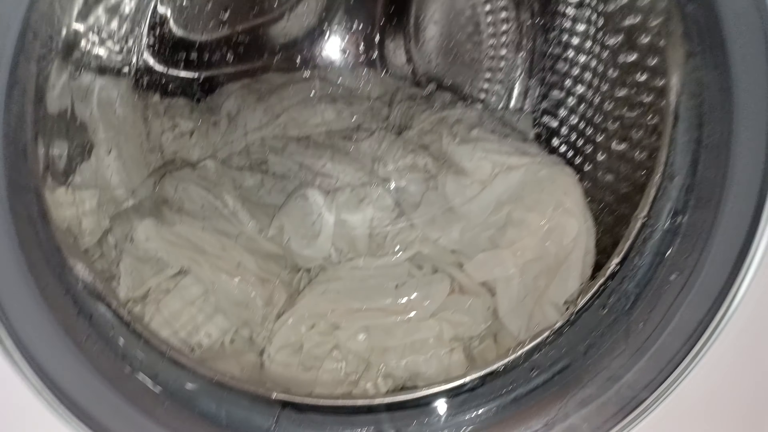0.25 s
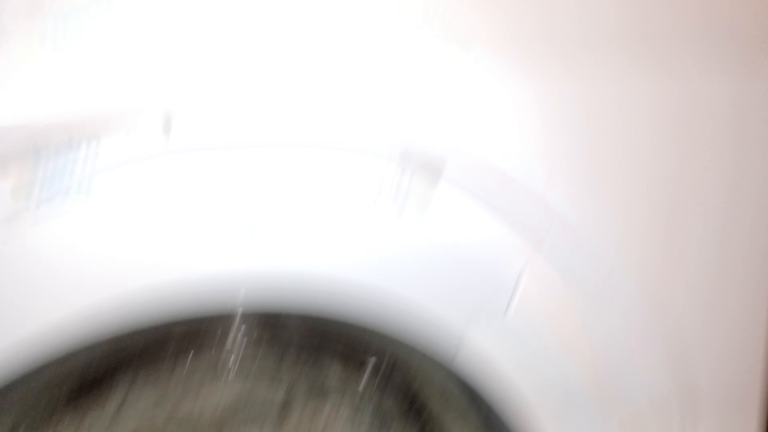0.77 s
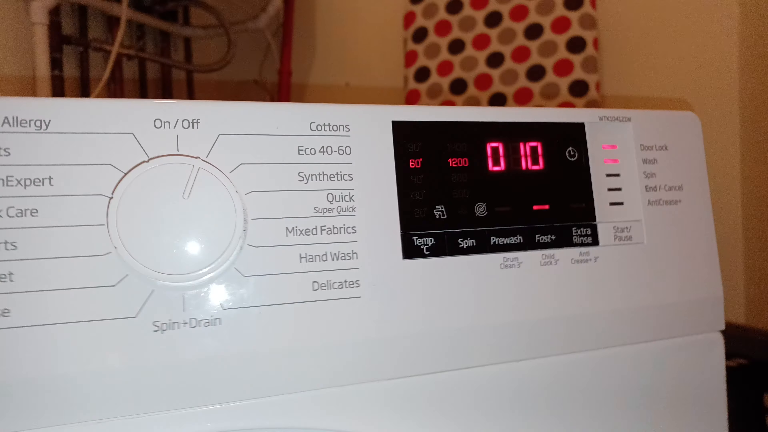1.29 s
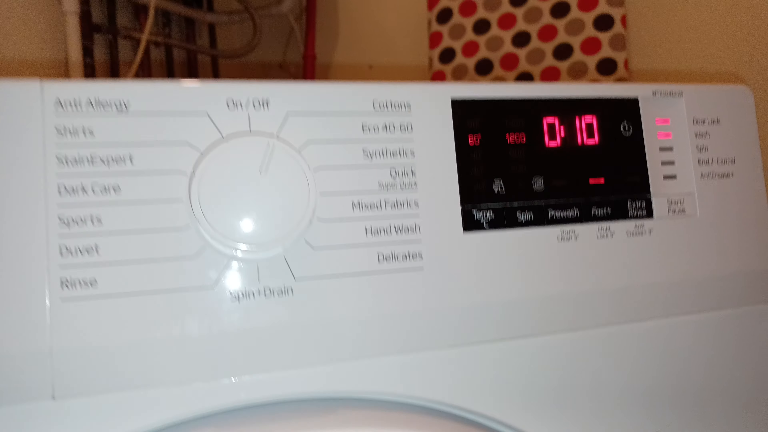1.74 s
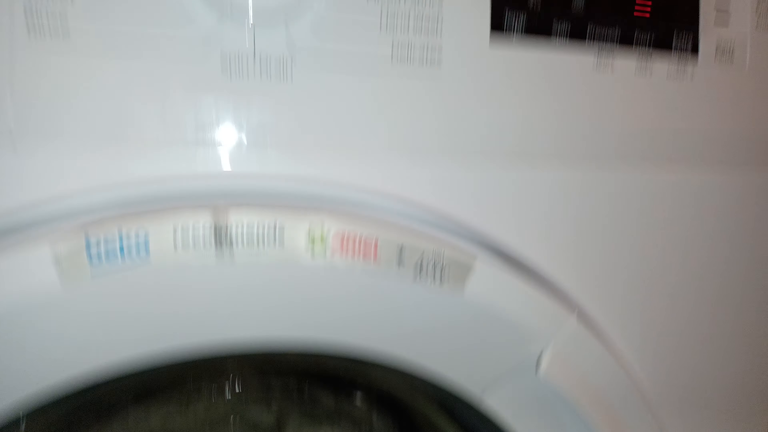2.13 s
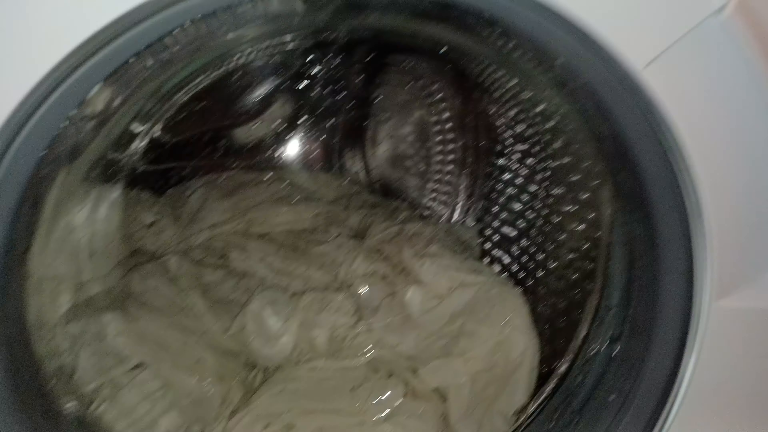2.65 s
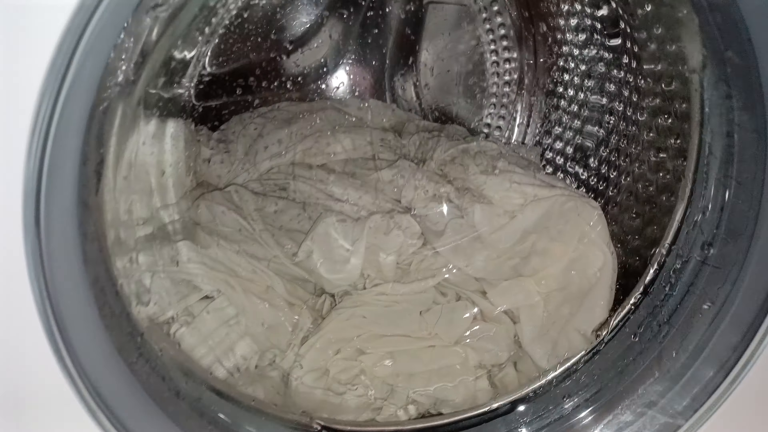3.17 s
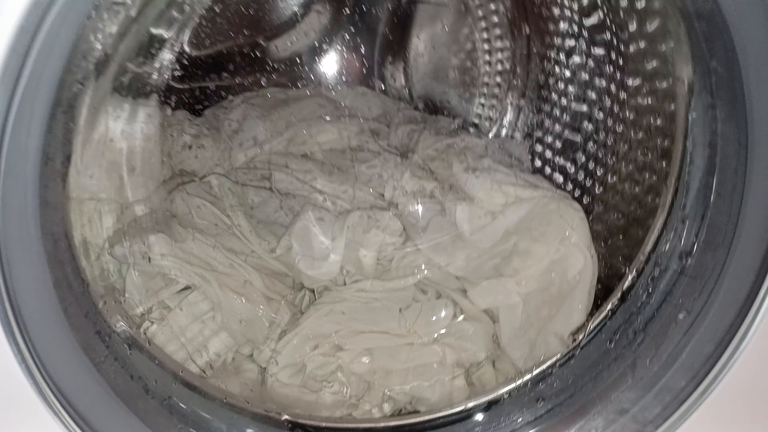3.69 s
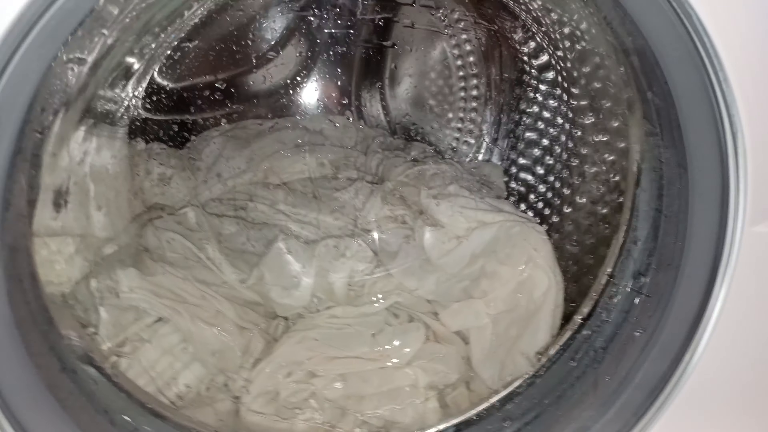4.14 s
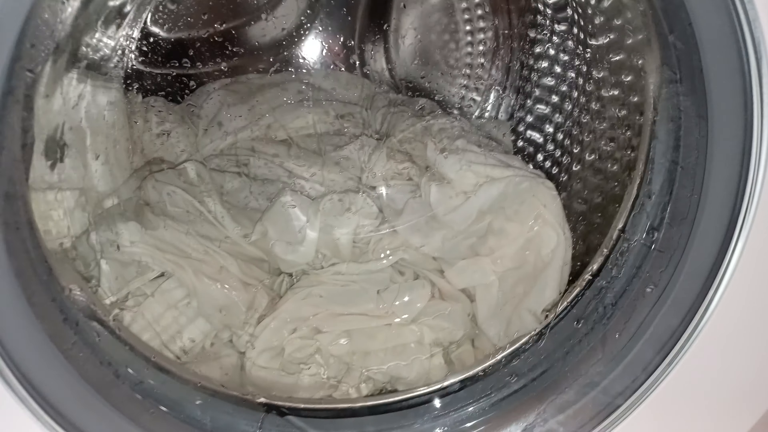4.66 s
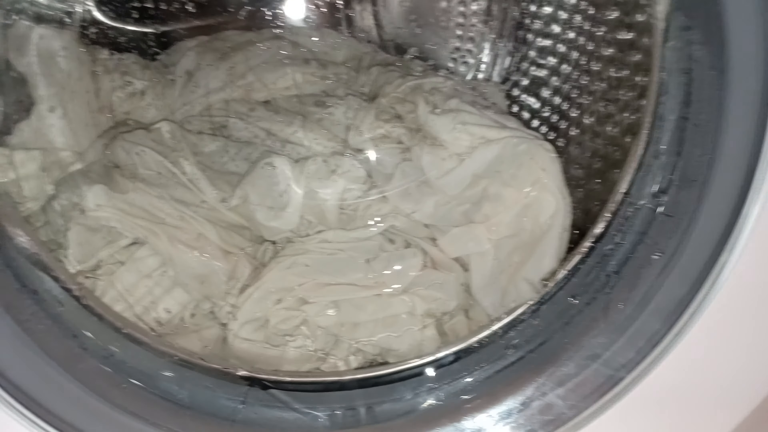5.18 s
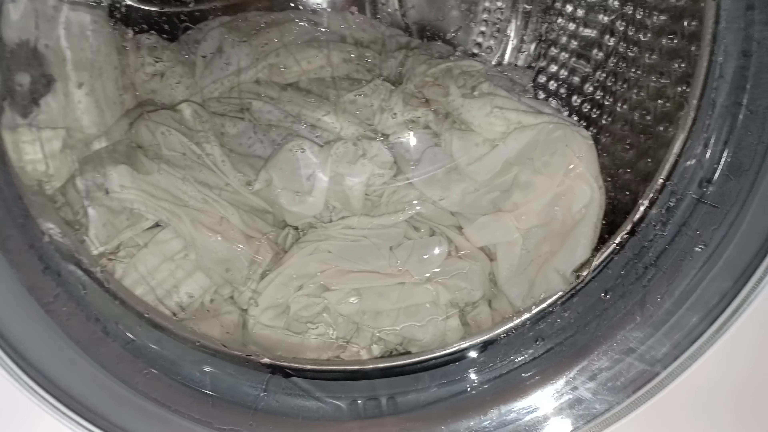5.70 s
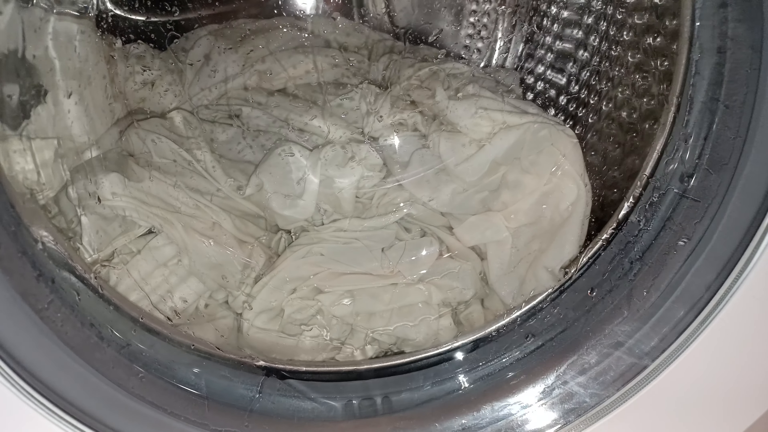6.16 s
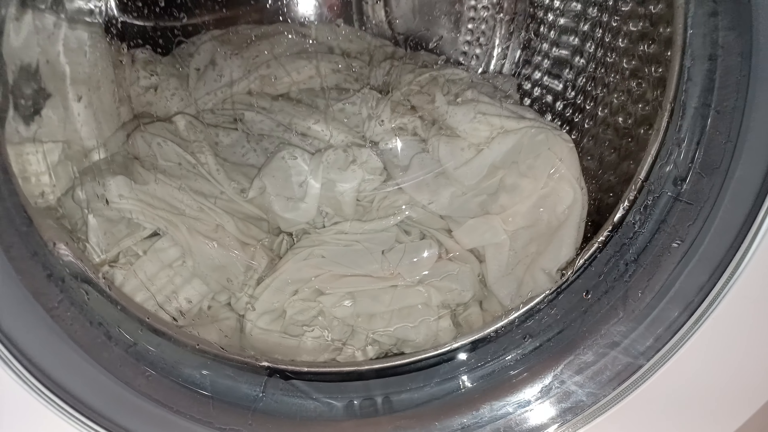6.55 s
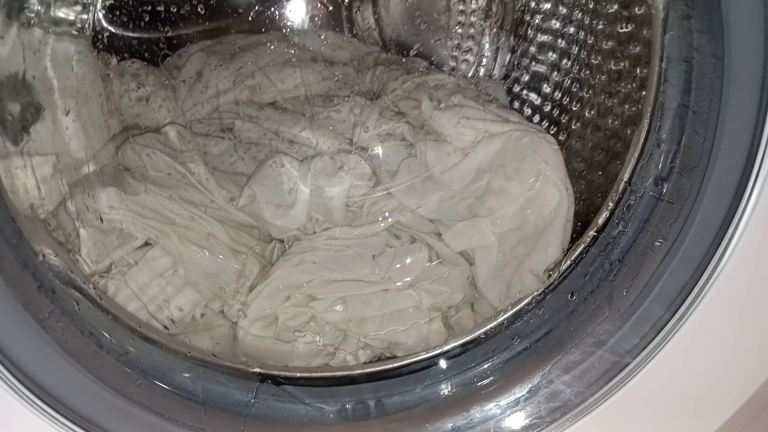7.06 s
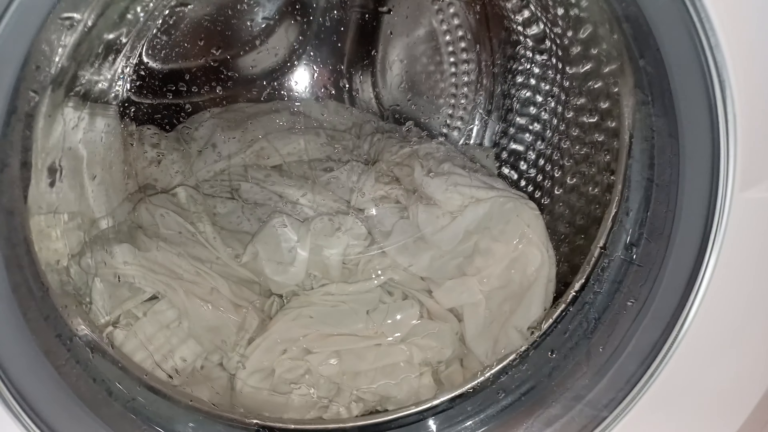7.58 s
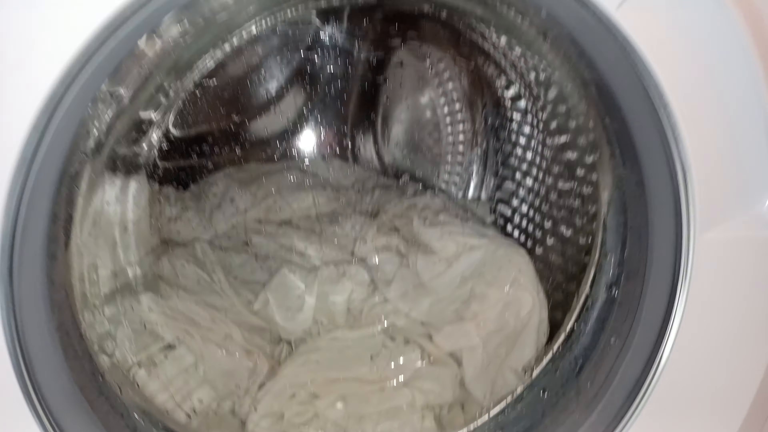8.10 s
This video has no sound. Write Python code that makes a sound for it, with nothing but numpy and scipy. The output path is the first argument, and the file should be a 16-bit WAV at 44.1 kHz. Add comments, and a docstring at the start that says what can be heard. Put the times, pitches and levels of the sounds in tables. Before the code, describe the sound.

A low, buzzing pump drone with a faint whine runs throughout, wrapped in churning, airy cabinet noise. Soft boomy knocks stumble in rapidly at first, strike again in pairs, then fade to faint bumps. Two weak breathy whistling resonances waver inside the rush. Treble hiss steps up after three seconds. Heard indoors, close to the washer door, in stereo, the microphone drifting and finally backing away.

```python
"""Near a washing machine, at a hand-held stereo microphone: the pump motor drones at multiples of the
mains, as sines, over water and air in the cabinet, made of noise coloured by its resonances.
Dull knocks, most of them early, are falling sines with ringing panel modes and ticks of noise.
A low shudder of noise gathers around each knock over a growing floor; narrow noise makes two whistles.
A thin hiss of treble noise swells briefly at 2.56 s, then steps up near 3.2 s and stays."""
import sys
import numpy as np
from scipy import signal
from scipy.fft import rfft, irfft
from scipy.io import wavfile
from scipy.ndimage import uniform_filter1d

SR = 44100
rng = np.random.default_rng(int(sys.argv[2]) if len(sys.argv) > 2 else 0)


def dump_mix(stems):
    """Bounce the given channels to the path in sys.argv[1] as a 16-bit WAV at rate SR."""
    frames = np.atleast_2d(stems).T  # one column per channel
    limited = np.clip(frames, -1, 1)  # hard clip at full scale
    pcm = np.round(limited * 32767).astype(np.int16)
    wavfile.write(sys.argv[1], SR, pcm)


N = 367353  # samples

# Moves of the hand-held microphone (start [s], end [s])
SETTLE_S = (2.2, 3.35)  # the hand settles into its steady place
BACK_AWAY_S = (5.5, 8.9)  # it backs away from the door, and is still moving at the end


MAINS_HZ, MAINS_START_RAD = 49.99, -1.03  # the start is the place in the mains cycle
ODD_LAG_RAD = -1.8  # by which the odd multiples trail the even ones
LOOSE = (3, 5)  # multiples that waver more than the rest
LOW_TONE_DROP = (7, 7.1, -3)  # the hand pulls back: (start [s], end [s], change [dB])
THIRD_TONE_DROP = (.9, 0.95, 7.5)  # (start [s], end [s], level before it above that after it [dB])
TURN_ASIDE = (1.6, 1, -3)  # sixth tone swings right: (middle [s], width [s], left-right [dB])
EARLY_LEAD_RAD = 0.6  # added left lead of the sixth tone until the hand settles
# Strong motor tones; each swells or sinks once as the hand drifts through its standing wave:
# (multiple of the mains, level at start [dB], growth [dB/s], left-right [dB], swell [dB],
#  swell middle [s], swell width [s], change on backing away [dB])
STRONG_TONES = [(2, -44, 0.49, 0, 1.7, 6.9, 1.2, -1.5), (3, -56.5, 0.07, -2, 9.5, 4.24, 3.9, -20),
                (4, -42.5, 1.0, -2.5, -5.5, 1.62, 1.97, -4.5), (5, -57.5, -0.7, 2, 2, 5.1, 2.4, -11),
                (6, -48, 0.65, 2.5, -3.5, 3.16, 1.8, -5)]
# Stereo phase of the strong tones, {multiple: left lead [rad]}
STRONG_LEAD_RAD = {2: -0.055, 3: .1, 4: -0.22, 5: 0.18, 6: .25}
# Upper motor tones; each microphone drifts through its own part of their standing waves:
# {multiple: rows of (time [s], left level [dB], right level [dB], left lead [rad])}
WHINE_TONES = {9: [(0, -72.5, -65, 0.1), (.8, -57, -59, .9), (1.2, -50, -72, -1.6), (2.2, -56.5, -63, .5),
               (2.7, -77, -56, .9), (5.8, -70, -59, 0.74), (8.33, -80, -75, .6)], 11: [(0, -63, -60, -1.1),
               (.42, -61, -50, -.9), (1.0, -58, -48, -.4), (2.3, -59, -48, -1.1), (2.8, -60, -53, -2.3),
               (4.3, -65, -52, -2.4), (6.3, -61, -55, -2.7), (8.33, -63, -58, -2.8)],
               12: [(0, -66, -68, -1.1), (1.5, -60, -59, .5), (2.5, -72, -66, 2.9), (3.5, -63, -58, 3.5),
               (6.5, -63, -61, 3), (8.33, -74, -54, 1.5)], 15: [(0, -63, -68, -3), (1.5, -63, -63, 0),
               (2.5, -57, -58, -1.7), (4.5, -62, -59, -3.5), (6.5, -58, -58.5, -2.5), (8.33, -58, -64, -2)],
               16: [(0, -65, -65, -1), (2.6, -70, -70, -2.5), (3.4, -58, -54.5, -1.5), (4.7, -59, -56, -3),
               (5.6, -65, -64, 1), (6.7, -61, -64, 0), (7.5, -59, -54, -2), (8.33, -61, -63, -4)],
               17: [(0, -63, -58, -1.3), (2.5, -63, -59, -1.2), (3.5, -68, -56, -1.5),
               (5.5, -66, -56, -0.86), (8.33, -69, -67, -1.5)], 18: [(0, -80, -68, -1.8),
               (2.5, -63, -67, -.5), (3.5, -66, -69, -.3), (5.5, -58.5, -77, -1.1), (8.33, -59, -78, -1.5)],
               13: [(0, -64, -50, 2), (.7, -62, -52, .5), (1.2, -51, -74, -3), (2.3, -53, -61, -1),
               (2.9, -64, -57, -5.5), (4.5, -67, -54.5, -5), (6.3, -65, -54, -6.5), (8.33, -69, -60, -6.5)]}
# Faint motor tones (multiple of the mains, left level [dB], right level [dB])
FAINT_TONES = [(7, -67, -65.5), (8, -69.5, -63.5), (10, -64, -70), (14, -64, -63), (19, -62.5, -63),
               (25, -81, -62.5)]


def motor():
    """Magnetic pull at multiples of the mains; the strong tones run in step as a soft sawtooth."""
    t, sides = np.arange(N) / SR, np.array([[.5], [-.5]])
    turn = 2 * np.pi * MAINS_HZ * t + MAINS_START_RAD
    return np.sqrt(2) * (strong_tones(t, sides, turn) + whine(sides, turn) + faint_tones(turn))


def strong_tones(t, sides, turn):
    """Low multiples of the mains, locked in phase, with levels that follow the microphone."""
    out, away = np.zeros((2, N)), ramp(t, *BACK_AWAY_S)
    for k, db, growth_db, balance_db, swell_db, middle, width, away_db in STRONG_TONES:
        k = round(k)
        level_db = db + growth_db * t + swell_db * hump(t, middle, width) + away_db * away
        lead = STRONG_LEAD_RAD[k]
        waver_db = 0.3  # rms
        if k in LOOSE:
            waver_db += 2.1
        if k == 2:
            level_db = level_db + LOW_TONE_DROP[2] * ramp(t, *LOW_TONE_DROP[:2])
        if k == 3:
            level_db = level_db + THIRD_TONE_DROP[2] * (1 - ramp(t, *THIRD_TONE_DROP[:2]))
        if k == 6:
            balance_db = balance_db + TURN_ASIDE[2] * hump(t, *TURN_ASIDE[:2])
            lead = lead + EARLY_LEAD_RAD * (1 - ramp(t, *SETTLE_S))
            waver_db += .9
        level_db = level_db + sides * balance_db + waver_db * drift(top_hz=8)
        phase = k * turn + lead * sides - ODD_LAG_RAD * (k % 2)
        out -= gain_of(level_db) * np.sin(phase)
    return out


def whine(sides, turn):
    """Upper multiples of the mains, each with its own path of level and phase at either side."""
    out = np.zeros((2, N))
    for k, rows in WHINE_TONES.items():
        left_db, right_db, lead = over_time(rows)
        level = gain_of([left_db, right_db] + 0.45 * drift(top_hz=7.2))
        phase = round(k) * turn + sides * lead + 0.65 * drift(top_hz=0.98)
        out += level * np.sin(phase)
    return out


def faint_tones(turn):
    """Weak multiples; each side sits in its own part of the standing wave and wavers alone."""
    out = np.zeros((2, N))
    for k, *sides_db in FAINT_TONES:
        for side, db in enumerate(sides_db):
            level = gain_of(db + 2.0 * drift(top_hz=8, low_hz=0.495))
            out[side] += level * np.sin(round(k) * turn + 1.25 * drift(top_hz=0.812))
    return out


RUSH_BAND_HZ = (700, 5000)  # where the level curve holds
# Bright band that fades early
OPENING_HZ, OPENING_WIDTH_HZ, OPENING_DB, OPENING_FADE_S = 2700, 350, 4.7, (.35, .8)
# Broad colour of the rush (frequency [Hz], relative density [dB per Hz])
RUSH_COLOUR = [(24, -30), (42, -46), (60, -35), (81, -5), (111, -25), (150, -13.5), (198, -14.5),
               (248, -17.5), (310, -14), (430, -15.5), (1540, -17.5), (1700, -15.5), (2020, -10.5),
               (2500, -16), (3020, -21.5), (3800, -23), (4970, -23.5), (15700, -55)]
# Cabinet peaks and dips in the rush (frequency [Hz], width [Hz], change [dB])
CABINET_MODES = [(80.6, 7.8, 11), (125.1, 14.6, 21.5), (179, 18, -21), (249, 59, 5.5), (283, 32, 9.5),
                 (441, 19, -12.5), (885, 20, -4), (1272, 32, -4), (1480, 350, 2), (1527, 120, 3),
                 (1990, 550, -4)]
# Bands that change with the place of the microphone
# (frequency [Hz], width [Hz], before settling [dB], settled [dB], backed away [dB])
PLACE_BANDS = [(476, 160, 5.5, -3, -3.5), (720, 1800, 0.3, 2, 3.5), (930, 160, 2.5, -0.5, -3.5),
               (2500, 2200, 1.5, -0.85, -1.5), (5800, 2800, -2, -2.5, 1)]
# Level of the rush in its band, before surges and flutter (time [s], level [dB])
RUSH_LEVEL_CURVE = [(0, -43), (.35, -42.5), (2.1, -42.5), (3.5, -40.5), (4.9, -41), (5.6, -40.5),
                    (6.3, -42), (7.7, -42), (8.33, -43)]
# Short surges of the rush (middle [s], width [s], rise [dB])
RUSH_SURGES = [(.38, .08, 1.8), (.75, .12, 0.2), (1.27, 0.095, 0.9), (1.72, .1, 1), (2.25, 0.074, 1.1),
               (2.56, 0.097, 1.9)]


def rush():
    """Water and air churned by the pump: noise heard through the resonances of the cabinet."""
    def colour_db(hz, t):
        opening_db = OPENING_DB * (1 - ramp(t, *OPENING_FADE_S))
        total = over_hz(RUSH_COLOUR, hz) + opening_db * bell(hz, OPENING_HZ, OPENING_WIDTH_HZ)
        for f, width, db in CABINET_MODES:
            total = total + db * bell(hz, f, width)
        settled, away = ramp(t, *SETTLE_S), ramp(t, *BACK_AWAY_S)
        for f, width, early_db, settled_db, away_db in PLACE_BANDS:
            place_db = early_db * (1 - settled) + settled_db * (settled - away) + away_db * away
            total = total + place_db * bell(hz, f, width)
        return total

    t = np.arange(N) / SR
    surge_db = sum(db * hump(t, middle, width) for middle, width, db in RUSH_SURGES)
    flutter_db = 0.5 * drift(top_hz=25.44, low_hz=4.5)
    level = gain_of(over_time(RUSH_LEVEL_CURVE) + surge_db + flutter_db)
    return level * noise(colour_db, patchy_db=1.1, ridged_db=3.5, size=4096, unit_band=RUSH_BAND_HZ)


GLIDE_S = 0.0034  # time constant of the fall in pitch of a thud
# Knocks (time [s], thud level [dB], push 1 or pull -1, starting pitch [Hz], settled pitch [Hz],
#  rise [s], t60 [s], tick level before its treble is sharpened [dB], shudder level [dB])
KNOCK_EVENTS = [(0.119, -27, 1, 200, 140, .005, .04, -80, -44),
                (0.145, -26, 1, 230, 190, .004, .05, -80, -44),
                (0.179, -19.5, 1, 170, 130, .005, .065, -79, -44),
                (0.2015, -23, 1, 240, 180, .003, .05, -80, -42),
                (0.2413, -15.5, 1, 242, 125, .004, .04, -66, -42),
                (0.269, -23, -1, 240, 150, .003, .04, -80, -42),
                (0.308, -17, 1, 230, 120, .004, .05, -59, -42),
                (0.388, -26, 1, 200, 160, .0057, .045, -80, -38),
                (0.425, -10, 1, 226, 121, .0043, .051, -52, -41),
                (1.0255, -13, 1, 220, 118, .0045, .05, -63, -38),
                (1.092, -11, 1, 247, 121, .0045, .045, -62, -40),
                (1.115, -26, 1, 200, 150, .004, .045, -80, -40),
                (1.884, -20, -1, 240, 122, .003, .14, -73, -40),
                (1.929, -24, 1, 200, 125, .004, .05, -80, -40),
                (1.952, -25, -1, 228, 125, .003, .06, -82, -40),
                (1.980, -27, 1, 220, 140, .004, .04, -80, -42),
                (2.016, -28, 1, 220, 170, .004, .04, -80, -42),
                (2.047, -28, 1, 260, 220, .004, .04, -80, -44),
                (2.555, -28, -1, 200, 125, .004, .05, -80, -42),
                (2.583, -29, -1, 260, 200, .003, .045, -80, -42),
                (3.159, -29, 1, 260, 200, .003, .04, -80, -44),
                (3.180, -27, -1, 300, 250, .003, .05, -77, -42),
                (3.198, -27, 1, 170, 110, .004, .06, -80, -42),
                (3.209, -27, 1, 180, 130, .004, .06, -80, -42),
                (5.991, -29, 1, 160, 121, .006, .045, -80, -41)]
# Ringing panel modes (frequency [Hz], level against the thud before build-up [dB], t60 [s])
PANEL_MODES = [(59, 0.5, 0.14), (85, -18, 0.11), (228, 2, 0.06), (275, -17, 0.02)]


def knocks():
    """Each blow is a bright tick and a thud that falls in pitch; the panel swells and rings after it."""
    t, out = np.arange(SR // 2) / SR, np.zeros((2, N))
    grits = rng.standard_normal((len(KNOCK_EVENTS), 2, len(t)))
    ring = np.zeros(len(t))
    for hz, db, t60 in PANEL_MODES:
        build_up = (1 - np.exp(-t * hz / 3.1)) ** 2  # a mode needs a cycle and more
        ring = ring + build_up * gain_of(db - 60 * t / t60) * np.sin(2 * np.pi * hz * t)
    for event, grit in zip(KNOCK_EVENTS, grits):
        s, thud_db, way, start_hz, settled_hz, rise, t60, tick_db, _ = event
        turns = settled_hz * t + (start_hz - settled_hz) * GLIDE_S * (1 - np.exp(-t / GLIDE_S))
        decay = gain_of(-60 * (t / t60) ** 1.24)  # holds, then is damped
        thud = ramp(t, 0, rise) * decay * np.sin(2 * np.pi * turns)
        sharp = np.diff(grit, n=4, axis=1, prepend=np.zeros((2, 4)))
        tick = sharp * gain_of(tick_db - 60 * t / 0.011)
        blow = np.sign(way) * gain_of(thud_db) * (thud + ring)
        part = out[:, round(s * SR):][:, :len(t)]
        part += blow * gain_of([[-.5], [.5]]) + tick  # the right side is 1 dB stronger
    return out


SHUDDER_LAG_S = 0.0094  # from the onset of a knock to the top of its shudder
SHUDDER_RISE_DB_PER_S, SHUDDER_FALL_DB_PER_S = 298, 113
SHUDDER_FLOOR_DB = (-68.5, -45)  # at the start and at the end
# Colour of the shudder (frequency [Hz], relative density [dB per Hz])
SHUDDER_SPECTRUM = [(40, -8), (60, -40), (120, 3.5), (150, -6), (180, -10), (230, -8), (300, -12.5),
                    (400, -34), (800, -58)]


def shudder():
    """Lumpy low noise that gathers before each knock and dies after it, over a slowly growing floor."""
    colour = gain_of(over_hz(SHUDDER_SPECTRUM, np.fft.rfftfreq(N, 1 / SR)))
    low = evened(irfft(rfft(rng.standard_normal(N)) * colour, N))
    t, level = np.arange(N) / SR, gain_of(np.linspace(*SHUDDER_FLOOR_DB, N))
    for s, *_, db in KNOCK_EVENTS:
        since = t - s - SHUDDER_LAG_S
        slope_db = np.minimum(SHUDDER_RISE_DB_PER_S * since, -SHUDDER_FALL_DB_PER_S * since)
        level = np.hypot(level, gain_of(db + slope_db))
    return level * gain_of(1.0 * drift(top_hz=23.0)) * low


WHISTLE_HZ, WHISTLE_PAN_DB = (1540, 1850), (-5, 0)  # lower and upper; pan is left-right
WHISTLE_WIDTH_HZ, WHISTLE_WANDER_HZ, WHISTLE_WAVER_DB = 55, 4.9, 1.8  # the last two are rms
# Levels before the waver and pan (time [s], lower whistle level [dB], upper whistle level [dB])
WHISTLE_LEVEL_CURVE = [(0, -56, -68.5), (1.2, -73, -73), (2.4, -57, -59), (3.0, -55, -56),
                       (3.6, -54.5, -61.5), (5.9, -56, -59), (7.2, -57, -64), (7.6, -60, -58),
                       (8.33, -59, -68)]


def whistle():
    """Two narrow cabinet resonances rung by noise, partly shared by the sides; their pitch strays."""
    out, hz = np.zeros((2, N)), np.fft.fftfreq(N, 1 / SR)
    sides = np.array([[.5], [-.5]])
    levels_db = over_time(WHISTLE_LEVEL_CURVE)
    for centre_hz, level_db, pan_db in zip(WHISTLE_HZ, levels_db, WHISTLE_PAN_DB):
        a, b = rng.standard_normal((2, 3, N))
        common, *own = np.fft.ifft((a + 1j * b) * bell(hz, 0, WHISTLE_WIDTH_HZ))
        pitch_hz = centre_hz + WHISTLE_WANDER_HZ * drift(top_hz=6, low_hz=.6)
        turn = 2 * np.pi * np.cumsum(pitch_hz) / SR
        ring = evened(((common + 1.1 * np.array(own)) * np.exp(1j * turn)).real)
        waver_db = WHISTLE_WAVER_DB * drift(top_hz=30, low_hz=4)
        out += gain_of(level_db + waver_db + pan_db * sides) * ring
    return out


HISS_BAND_HZ = (11000, 15500)  # where the level curve holds
SWISH = (2.564, 0.28, 10.7)  # one short swell of the hiss: (middle [s], width [s], rise [dB])
# Colour of the hiss (frequency [Hz], relative density [dB per Hz])
HISS_COLOUR = [(5000, -2), (7000, -4.5), (9000, -9.5), (12000, -3), (14500, -7), (15700, -9)]
# Level of the hiss in its band, before swish and flicker (time [s], level [dB])
HISS_LEVEL_CURVE = [(0, -64.5), (.85, -62.5), (1.3, -63), (1.6, -68.5), (2.4, -66), (2.8, -66), (3.13, -67),
                    (3.25, -58), (4.5, -60.5), (5.2, -59), (7.3, -60), (8.05, -58.5), (8.33, -57.5)]


def hiss():
    """Thin flickering treble noise; it swells once, briefly, then steps up near 3.2 s and stays."""
    def colour_db(hz, t):
        return over_hz([(2500, -65)] + HISS_COLOUR, hz)  # next to nothing below 2500 Hz

    swish_db = SWISH[2] * hump(np.arange(N) / SR, *SWISH[:2])
    level = gain_of(over_time(HISS_LEVEL_CURVE) + swish_db + 1.05 * drift(top_hz=15))
    return level * noise(colour_db, patchy_db=2.0, ridged_db=0.0, size=512, unit_band=HISS_BAND_HZ)


# Likeness of the two microphones (frequency [Hz], left-right likeness [0 to 1])
LIKENESS = [(30, 0.97), (60, 0.98), (150, 0.81), (260, 0.76), (380, 0.58), (950, 0.23), (1290, .12),
            (1640, 0.21), (2000, .15), (2450, 0.24), (3100, 0.11), (5980, 0.084), (15000, 0.05)]
# Stereo balance of the noise (frequency [Hz], left-right [dB])
STEREO_TILT = [(60, -4), (150, 2.5), (350, 1), (600, -1.5), (850, 0), (1500, -1), (1750, -2), (2100, -2),
               (2900, 0), (4300, -5), (5300, -4.5), (6300, 2), (9000, -2), (15000, 0.0)]
# Stereo phase of the noise (frequency [Hz], left lead [rad])
STEREO_LEAD = [(60, -0.31), (430, 0), (760, -1.5), (950, 0), (1640, 1.14), (2000, 0.7), (2400, -1.2),
               (3100, -3)]


def noise(colour_db, patchy_db, ridged_db, size, unit_band):
    """Stereo noise from random short-time spectra with quick wide patches and slow narrow room ridges;
    rms 1 within unit_band."""
    hop, hz = size // 4, np.fft.rfftfreq(size, 1 / SR)
    frames = 4 * N // size + 5
    a, b, c, d, patches, *ridges = rng.standard_normal((frames, len(hz), 7)).T
    patches = uniform_filter1d(patches, size=size // 100, axis=0)
    patches = evened(uniform_filter1d(patches, size=4, axis=1))
    ridges = evened(uniform_filter1d(np.array(ridges), size=70, axis=2))
    same = np.clip(over_hz(LIKENESS, hz), -1, 1)[:, None]
    left = a + 1j * b
    right = same * left + np.sqrt(1 - same ** 2) * (c + 1j * d)
    z = np.array([left * np.exp(1j * over_hz(STEREO_LEAD, hz))[:, None], right])
    z *= gain_of(np.multiply.outer([.5, -.5], over_hz(STEREO_TILT, hz)))[..., None]
    z *= gain_of(colour_db(hz[:, None], np.arange(frames) * size / 4 / SR) + patchy_db * patches)
    # standing waves differ side to side, not in the bass
    z *= gain_of(ridged_db * (1 - abs(same)) * ridges)
    power = (abs(z) ** 2).sum(axis=(0, 2))
    share = power[(hz > unit_band[0]) & (hz < unit_band[1])].sum() / power.sum()
    wave = signal.istft(z, nperseg=size, noverlap=size - hop)[1][:, :N]
    return evened(wave) / np.sqrt(share)


def drift(top_hz, low_hz=0.2):
    """Slow wandering of rms 1: sines of random phase, weaker as they get faster."""
    t = np.arange(0, N + 64, 64) / SR
    rates_hz = np.geomspace(low_hz, top_hz, num=20)
    slow = sum(np.sin(2 * np.pi * (f * t + rng.random())) / np.sqrt(f) for f in rates_hz)
    return np.interp(np.arange(N) / SR, t, evened(slow))


def bell(hz, centre_hz, width_hz):
    """Shape of one resonance, top 1, as wide as given at half height."""
    return 1 / (1 + (2 * (hz - centre_hz) / width_hz) ** 2)


def ramp(t, start, end):
    """Smooth step from 0 to 1."""
    return np.sin(np.pi / 2 * np.clip((t - start) / (end - start), 0, 1)) ** 2


def hump(t, middle, width):
    """Smooth swell in time, top 1."""
    return np.exp(-(2 * (t - middle) / width) ** 4)


def over_hz(points, hz):
    """Reads a spectrum on a log-frequency axis."""
    f, value = np.transpose(points)
    return np.interp(np.log(hz + 1), np.log(f + 1), value)


def over_time(rows):
    """Joins the rows of a curve sample by sample, one array a column."""
    s, *columns = np.transpose(rows)
    return np.array([np.interp(np.arange(N) / SR, s, c) for c in columns])


def gain_of(db):
    """Decibels to amplitude."""
    return 10 ** (np.asarray(db) / 20)


def evened(x):
    """Scales to rms 1."""
    return x / np.sqrt(np.mean(x ** 2) + 1e-20)


def scene():
    """All sources at the two microphones."""
    return motor() + rush() + knocks() + shudder() + whistle() + hiss()


LOW_CUT_HZ, EDGE_HZ = 50, 15740  # low cut of the microphone, upper limit of the recorder
DEEP_FLOOR_DB = -76  # faint recorder noise under the low cut


def record(dry):
    """Low cut of the microphone, a faint deep floor, then the band limit of the recorder."""
    low_cut = signal.butter(6, LOW_CUT_HZ, "high", fs=SR, output="sos")
    thinned = signal.sosfilt(low_cut, dry)
    deep_pass = signal.butter(2, LOW_CUT_HZ, fs=SR, output="sos")
    deep = signal.sosfilt(deep_pass, rng.standard_normal(N))
    thinned = thinned + gain_of(DEEP_FLOOR_DB) * evened(deep)
    band_limit = signal.firwin(1023, EDGE_HZ, window=("kaiser", 9), fs=SR)
    return signal.oaconvolve(thinned, band_limit[None], "same")


dry = scene()
out = record(dry)
dump_mix(out)
```